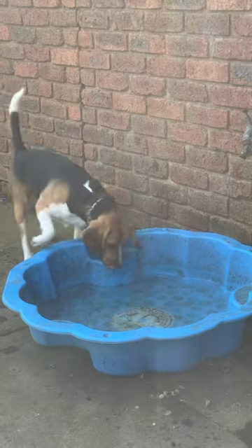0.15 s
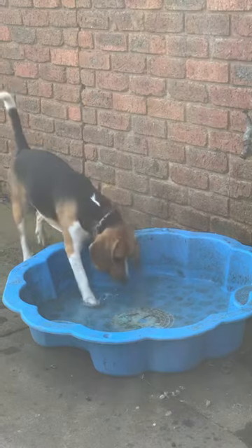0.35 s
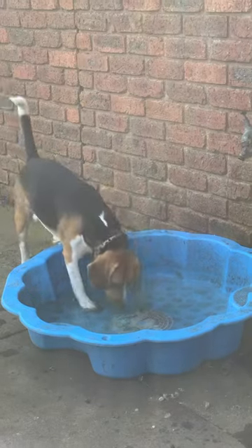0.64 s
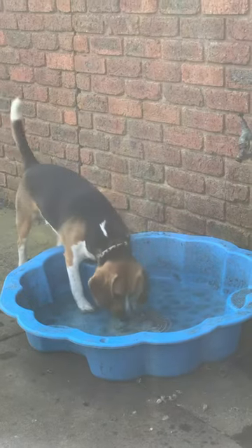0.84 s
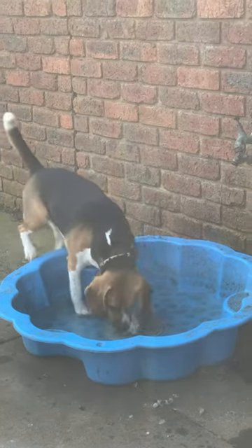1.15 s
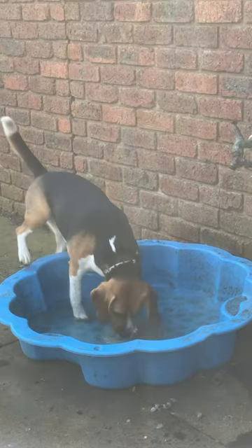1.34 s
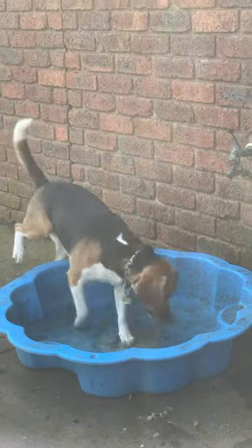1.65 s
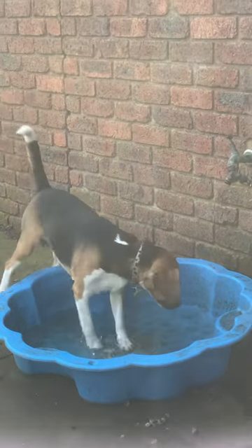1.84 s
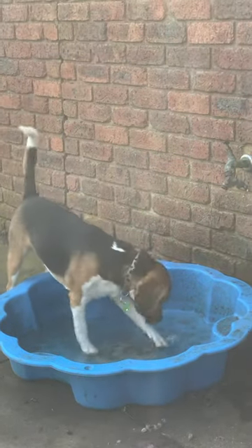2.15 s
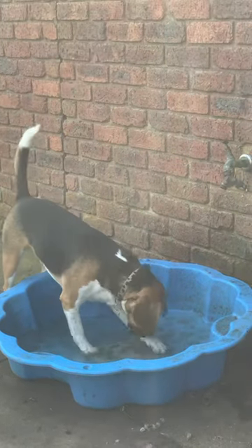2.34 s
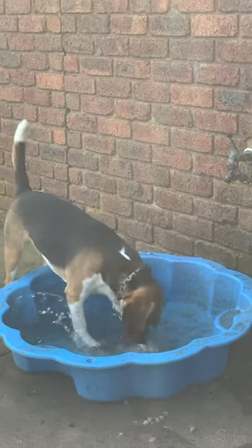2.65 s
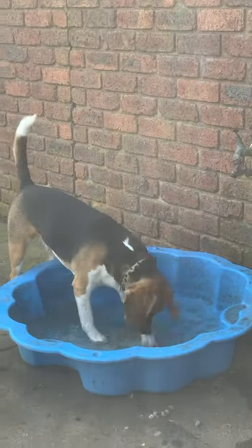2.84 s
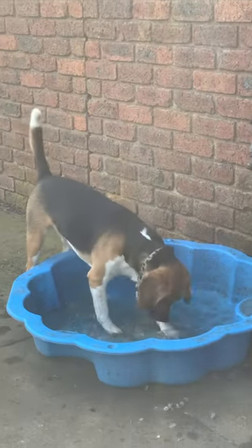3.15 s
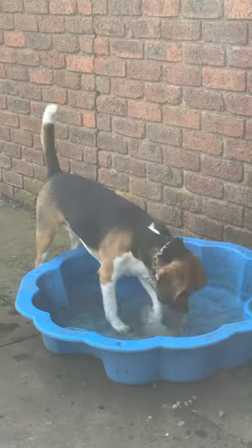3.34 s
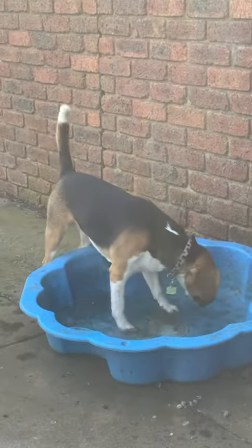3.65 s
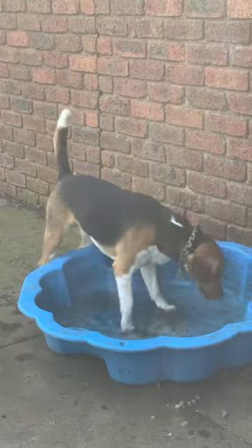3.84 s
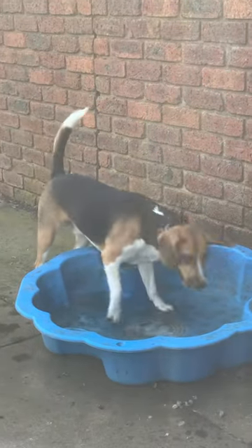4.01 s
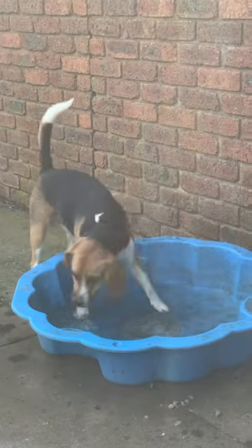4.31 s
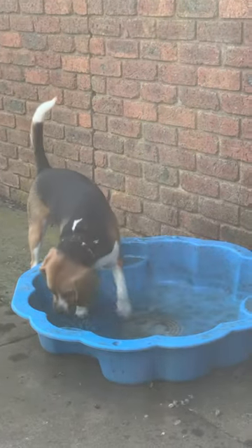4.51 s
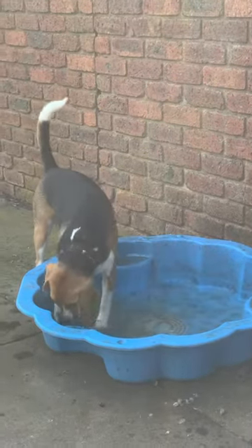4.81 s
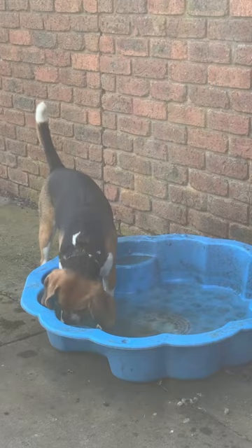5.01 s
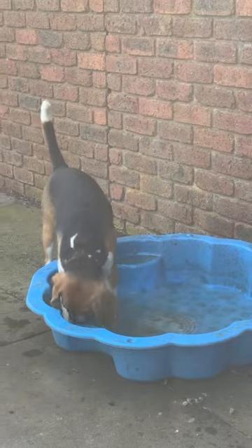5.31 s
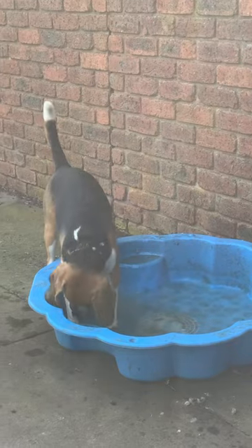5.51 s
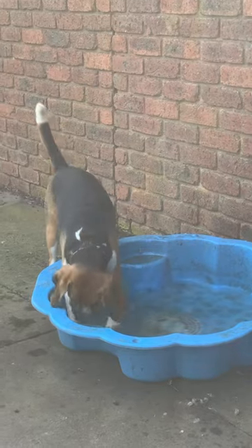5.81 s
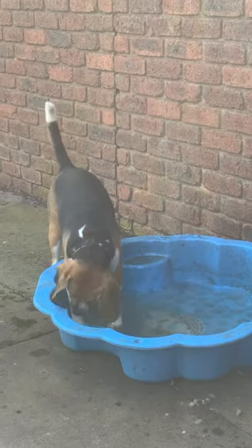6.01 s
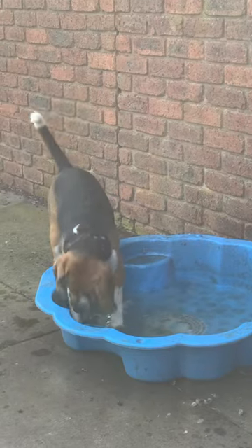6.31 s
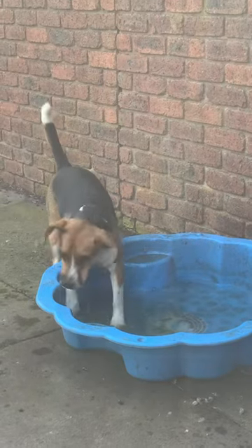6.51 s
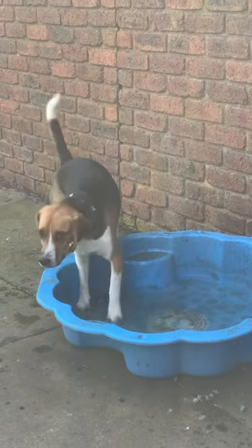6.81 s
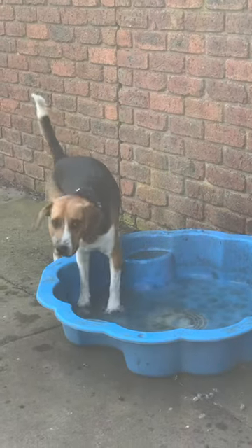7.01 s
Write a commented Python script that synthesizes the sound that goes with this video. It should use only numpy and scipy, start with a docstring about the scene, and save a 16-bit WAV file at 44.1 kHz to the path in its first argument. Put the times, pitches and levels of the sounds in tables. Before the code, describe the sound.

A dog paws at shallow water in a plastic paddling pool, with irregular slaps, bubbly plops, fine spray and dull tub thumps outdoors.

```python
"""A shallow plastic paddling pool beside a brick wall, where a dog paws and noses a few steps from a phone.
Paws slap the water: noise bursts crack, clouds of tiny ringing bubbles gurgle and spray.
Larger bubbles and torn air pockets ring at gliding pitches; paws thump the tub's low modes.
Swishes and snuffles are shaped noise, and stirred water trickles between the slaps.
Far traffic hums; two microphone ports hear the pool a little apart in time, with scattered echoes."""
import sys
import numpy as np
from scipy import signal
from scipy.fft import rfft, irfft, next_fast_len
from scipy.io import wavfile
from scipy.ndimage import uniform_filter1d, map_coordinates

SR = 44100
rng = np.random.default_rng(int(sys.argv[2]) if len(sys.argv) > 2 else 0)


def file_out(sig):
    """Save sig as 16-bit WAV at sys.argv[1]."""
    # one column per channel
    cols = np.atleast_2d(sig).T
    # limit, then scale
    lim = np.clip(cols, -1, 1)
    pcm = np.round(lim * 32767).astype(np.int16)
    wavfile.write(sys.argv[1], SR, pcm)


N = 315756

# Slaps and drops on the water, with settings for the crack, the spray and the plop:
# [start_s, crack_level_db, spray_level_db, plop_level_db, plop_pitch_hz, fade_s, rise_ms]
SLAP_EVENTS = [(.103, -60, -70, -62, 969.8, 0.2639, 6), (.348, -50, -57.5, -75, 1200, 0.2272, 6.86),
               (.445, -38, -47, -75.5, 2193, 0.10006, 0.755), (1.018, -43, -80, -70.5, 1645, 0.0498, 1),
               (1.178, -21, -51, -33, 1111, 0.2095, 0.5968), (1.241, -31, -49, -39, 1400, 0.16, 0.4415),
               (1.409, -50, -62, -47, 900, 0.1105, 2.294), (1.523, -34, -33, -38.5, 1745, .06, 2.5),
               (1.53, -11, -60, -38, 1878, 0.1007, 0.3993), (1.697, -60.5, -62.5, -66, 1037, 0.1966, 7.82),
               (1.732, -44, -54.5, -74, 1502, 0.0453, 0.986), (1.753, -25, -51, -70.5, 2036, 0.1446, .9),
               (1.808, -29.5, -55, -39.5, 1391, 0.0734, 3.682),
               (1.824, -30.5, -51.5, -49, 1549, 0.2072, 1.317), (1.872, -39, -49, -44, 1413, 0.0901, 0.989),
               (1.923, -31.5, -44.5, -85, 793.1, 0.0556, 0.656), (2.077, -45, -61, -67, 1844, 0.2148, 1.2),
               (2.148, -51, -50, -63, 2544, 0.078, 0.741), (2.232, -55, -66, -50, 1700, 0.04489, 4.08),
               (2.25, -51.5, -63, -53.5, 2397, 0.1041, 1), (2.366, -54.5, -55, -46.5, 1853, 0.0508, 4.256),
               (2.376, -24, -39, -46, 1100, 0.18903, 0.535), (2.434, -9.5,  -25, -35, 1467, 0.1456, 1.477),
               (2.444, -36.5, -32, -31.5, 1152, 0.18676, 7.094),
               (2.619, -36, -45, -71.5, 2602, 0.1586, 0.97), (2.651, -25, -55, -52, 1767, 0.3671, .6),
               (2.705, -27, -40, -71, 879.4, 0.03276, 0.93),
               (2.76, -28.5, -51.5, -41, 1526, 0.06704, 0.8683),
               (2.842, -19, -49.5, -41.5, 1143, 0.06455, 0.977),
               (2.85, -40, -31, -37.5, 1160, 0.14987, 4.55), (2.66, -40, -45, -42, 1200, .1, 2),
               (2.876, -27, -35.5, -36, 1594, 0.16103, 1.2), (3.012, -30, -70, -80.5, 1077, 0.0879, 1.44),
               (3.099, -25, -40, -47.5, 2617, 0.4787, 8.79), (3.138, -33, -48, -41, 1553, 0.13785, 2.479),
               (3.19, -31, -62, -53, 1200, 0.09505, 1.136),
               (3.231, -29.5, -69.5, -74.5, 1228, 0.0637, 1.226), (3.29, -34, -48, -50, 1900, .05, .6),
               (3.28, -40, -31.5, -32, 1681, 0.23042, 10.83),
               (3.311, -31.5, -34.5, -34.5, 1860, 0.07827, 1.3873),
               (3.458, -38.5, -55.5, -80.5, 2419, 0.1118, 0.776),
               (3.485, -30.5, -57, -48, 2555, 0.1154, 4.414), (3.502, -26, -51.5, -45, 1532, 0.2396, 0.746),
               (3.53, -28, -52, -56, 1900, .06, 1), (3.603, -29, -46, -60, 1200, .3, 2.5),
               (3.691, -31, -76.5, -41.5, 1121, 0.12634, 0.6782),
               (3.903, -49, -75, -50, 1398, 0.1094, 9.88), (4.016, -43, -51, -72, 1413, 0.176, 2.113),
               (4.211, -33, -52, -45, 1353, 0.1004, 0.721), (4.241, -40, -52, -65, 900, 0.1, 0.899),
               (4.298, -46, -60, -75, 1400, .05, 1), (4.62, -36, -35, -50, 3400, 0.1073, 4),
               (4.663, -34, -30.5, -30, 1628, 0.05237, 1.0172), (4.722, -50, -53, -41, 1300, .25, 12),
               (4.811, -31, -44.5, -80, 1580, 0.0653, 0.786), (4.905, -32.5, -47, -36, 1183, .13, 1.2),
               (4.987, -39, -51.5, -54.5, 1068, 0.2044, 4.496), (5.146, -45, -40, -42, 2400, .08, 6),
               (5.154, -27, -40, -34, 2425, 0.1192, 1), (5.28, -37.5, -34, -63.5, 1038, 0.05698, 4.717),
               (5.294, -30, -46, -29, 1750, 0.08, 1.2), (5.326, -37, -70, -41, 1737, 0.1, 0.8712),
               (5.462, -43, -65, -54, 1502, 0.133, 0.958), (5.531, -38, -28, -34, 2100, .13, 11),
               (5.555, -21, -53, -32.5, 1448, 0.0835, 0.5814), (5.649, -34, -53.5, -52, 2542, 0.1428, 12.6),
               (5.687, -34, -52.5, -38, 2092, 0.0993, 5.4), (5.752, -30, -32.5, -37, 1300, .19, 3),
               (5.82, -50, -60, -46, 1000, .06, 3), (5.905, -50, -60, -52, 1300, .1, 3),
               (5.945, -58.5, -57, -54, 900, 0.2017, 8.05), (6.037, -50, -60, -40, 1900, .09, 4),
               (6.088, -50, -55, -43, 1100, .08, 3), (6.115, -37, -37.5, -44.5, 2490, 0.04033, 3.95),
               (6.131, -21, -36, -29, 1354, .12, .6), (6.177, -30, -42, -41, 1700, 0.1743, 3),
               (6.301, -35, -59, -79.5, 1866, 0.3014, 0.843), (6.345, -36, -43, -53, 2724, 0.1058, 0.887),
               (6.368, -30, -52, -62, 2000, .06, 1), (6.462, -33.5, -78, -58.5, 2037, 0.172, 1.1),
               (6.578, -35, -53.5, -76.5, 1644, 0.0807, 1.06), (6.634, -38, -54, -48, 800, .1, 0.7565),
               (6.691, -40, -36, -54, 1982, .06, 3), (6.712, -40, -44, -46, 1500, .1, 4),
               (6.698, -16, -32, -45, 1990, .12, 1.5), (6.783, -54, -56.5, -46, 1440, 0.14685, 6.26),
               (6.9, -43, -63, -66.5, 1300, 0.0823, 0.672), (6.989, -36, -50, -73.5, 1093, 0.1855, 4.264),
               (7.03, -34, -62, -68.5, 1719, 0.2747, 0.985)]
# Tone colour of the spray: [pitch_hz, level_db]
SPRAY_COLOUR = [(1200, -18.5), (2500, -8), (3400, -5), (4200, -4), (6000, 2.5), (7500, -2), (9000, -8),
                (12000, -15), (15500, -29)]


def amp(db):
    """Turns decibels into a gain."""
    return 10 ** (np.asarray(db) / 20)


def unit(x):
    """Scales a sound to an rms level of 1."""
    return x / np.sqrt(np.mean(x ** 2) + 1e-20)


def along(points, hz):
    """Reads a curve of (Hz, value) points on a log frequency axis."""
    point_hz, value = np.transpose(points)
    return np.interp(np.log(hz + 1), np.log(point_hz + 1), value)


def curves(rows):
    """Draws straight lines between timed rows: one value per sample for each column after the time."""
    point_s, *columns = np.transpose(rows)
    return [np.interp(np.arange(N) / SR, point_s, column) for column in columns]


def wobble(rate):
    """Draws a smooth random curve with rate knots a second."""
    knots = rng.standard_normal(int(N * rate / SR) + 4)
    return map_coordinates(knots, [np.arange(N) * rate / SR])


def filtered(x, response):
    """Multiplies the spectrum of x by a response of frequency, which may be complex."""
    size = next_fast_len(N + SR // 2)
    hz = np.fft.rfftfreq(size, 1 / SR)
    return irfft(rfft(x, size) * response(hz), size)[..., :N]


def hiss(colour):
    """Makes coloured noise with an rms level of 1."""
    return unit(filtered(rng.standard_normal(N), lambda hz: amp(along(colour, hz))))


def add(track, s, sound):
    """Mixes a sound into a track, starting at s seconds."""
    part = track[max(round(s * SR), 0):][:len(sound)]
    part += sound[:len(part)]


def swell(t, rise, t60):
    """Shapes a soft rise, then an exponential fall of 60 dB in t60 seconds, both kept within limits."""
    onset = (1 - np.exp(-t / np.clip(rise, 2e-4, .05))) ** 2
    return onset * amp(-60 * t / np.clip(t60, .01, .6))


def patchy(x, depth_db):
    """Varies the gain at random in small patches of time and frequency."""
    z = signal.stft(x, nperseg=256)[2]
    field = uniform_filter1d(rng.standard_normal(z.shape), size=4, axis=0)
    field = uniform_filter1d(field, size=6, axis=1)
    return unit(signal.istft(z * amp(depth_db * unit(field)), nperseg=256)[1][:N])


def bubble(t, hz, lift, t60):
    """A bubble nearing the surface rings at a rising, unsteady pitch; lift is the share it climbs."""
    settle = t60 / 5
    turns = hz * (t + lift * (t - settle * (1 - np.exp(-t / settle))))
    flutter = uniform_filter1d(rng.standard_normal((2, len(t))), size=130)
    tone = np.sin(2 * np.pi * turns + 1.6 * flutter[0])
    return tone * (1 + 2.5 * flutter[1]) * swell(t, t60 / 18, t60)


def froth(colour, centre_hz, octaves, cycles, scatter_db, noise, count, size):
    """Many tiny random bubbles ring around a set pitch, over patchy noise; the rms level is 1."""
    start = rng.integers(0, N, count)
    pitch = rng.standard_normal((count, 1))
    big = rng.exponential(size=(count, 1))
    near_hz = centre_hz[start, None]
    hz = np.clip(near_hz * 2 ** (octaves * pitch), 400, 12000)
    turns = hz * np.arange(size) / SR
    rings = np.sin(2 * np.pi * turns * (1 + .015 * turns / cycles))
    rings = rings * np.exp(-turns / cycles) * (1 - np.exp(-turns))
    # low bubbles last longer, so they start softer
    levels = amp(scatter_db * np.minimum(big, 3.5)) * np.sqrt(hz / near_hz)
    places = start[:, None] + np.arange(size)
    grains = np.bincount(places.ravel(), (rings * levels).ravel(), N + size)
    return unit(unit(grains[:N]) + noise * patchy(hiss(colour), depth_db=3))


def cracks():
    """Each slap cracks as a short burst of random clicks, which the nearby bricks repeat once."""
    out, t = np.zeros(N), np.arange(800) / SR
    for s, crack_db, _, _, _, _, rise_ms in SLAP_EVENTS:
        clicks = 1.5 * rng.choice([-1, 1], size=800)
        add(out, s + .001, amp(crack_db) * swell(t, .4 * rise_ms / 1000, t60=.01) * clicks)
    echo = lambda hz: 1 + 0.18 * np.exp(-2j * np.pi * hz * 0.0024)  # 2.4 ms later
    return filtered(out, lambda hz: echo(hz) * amp(0.8198 * along(SPRAY_COLOUR, hz)))


def plops():
    """Each slap traps three bubbles, which ring soon after it near its plop pitch."""
    out, t = np.zeros(N), np.arange(SR // 12) / SR
    for s, _, _, plop_db, plop_hz, _, rise_ms in SLAP_EVENTS:
        for late, octave in rng.uniform(size=(3, 2)):
            ring = bubble(t, plop_hz * 2 ** (0.53182 * (octave - .5)), lift=0.19, t60=0.034)
            add(out, s + 1.504 * rise_ms / 1000 + 0.015 * late, amp(plop_db - 3.5) * ring)
    return out


def stirring():
    """Slow stirring, sloshes and slaps set the loudness of the low gurgle and the high spray."""
    # Slow stirring under everything: [time_s, gurgle_level_db, spray_level_db]
    stir_levels = [(0, -83, -75), (.3, -79, -83.5), (.8, -94, -92), (1.35, -79.5, -84), (1.9, -78, -71),
                   (2.3, -73, -82.5), (2.7, -72, -63), (3.2, -78, -65), (3.55, -72, -66),
                   (3.72, -81.5, -83.5), (4.05, -72.5, -80.5), (4.4, -90, -92), (4.8, -77.5, -66),
                   (5.06, -72.5, -77), (5.45, -62.5, -62.5), (5.9, -60.5, -66), (6.4, -63, -63),
                   (6.6, -77.5, -76), (6.85, -71, -66.5), (7.16, -79, -85)]
    # Water shoved aside without a blow; fall_s is the time to fall 20 dB after the crest:
    # [crest_s, gurgle_level_db, spray_level_db, fall_s]
    shoves = [(.44, -62, -65, 0.0633), (.57, -70, -74.5, 0.208), (1.029, -64.5, -69.5, 0.1983),
              (1.28, -59.5, -79, 0.0968), (1.45, -58, -68, .08), (1.51, -55, -59, .06),
              (1.599, -65, -65, 0.0783), (1.74, -67.5, -63, 0.0008), (1.83, -75, -60.5, 0.1575),
              (2.19, -63, -71.5, 0.0761), (2.259, -60.5, -63, 0.0612), (2.42, -52.5, -71.5, 0.1434),
              (2.58, -62, -59.5, 0.009), (2.69, -57, -43, 0.0172), (2.73, -69, -45, 0.0551),
              (2.84, -49.5, -50.5, 0.0431), (2.92, -54, -72, 0.1362), (3.091, -61.5, -49.5, 0.1152),
              (3.291, -47.5, -66.5, 0.0966), (3.57, -60, -49.5, 0.1299), (3.88, -70, -61, .14),
              (4.131, -65.5, -63.5, 0.1312), (4.25, -66, -77, .08), (4.48, -68, -68, .05),
              (4.54, -67, -60.5, 0.0896), (4.69, -52, -62, 0.0448), (4.87, -66, -58, 0.1753),
              (5.131, -50.5, -52.5, 0.1015), (5.34, -59, -66, 0.1638), (5.589, -54.5, -55.5, 0.2029),
              (5.74, -68, -56, 0.1781), (5.89, -55, -66, .08), (5.97, -52, -65.5, .1), (5.8, -60, -47, .04),
              (6.045, -53, -46.5, 0.0269), (6.3, -60.5, -58, 0.1436), (6.46, -51.5, -50, 0.1253),
              (6.7, -65, -50, 0.03), (6.74, -48.5, -65.5, 0.0231), (6.9, -70, -62, .05),
              (6.959, -63, -58, .08)]
    low, high = amp(curves(stir_levels))
    clock = np.arange(SR) / SR - .5  # seconds from the crest
    for s, gurgle_db, spray_db, fall in shoves:
        slope = np.where(clock < 0, 0.8283 * fall, fall)  # rises a little faster than it falls
        hump = amp(-20 * np.abs(clock) / slope)
        hump = hump[max(round((.5 - s) * SR), 0):]
        add(low, s - .5, amp(gurgle_db) * hump)
        add(high, s - .5, amp(spray_db) * hump)
    low, high = low * amp(0.62 * wobble(30)), high * amp(2.2605 * wobble(45))
    t, swell_s = np.arange(SR // 4) / SR, .012
    faint_swell = (t[t < swell_s] / swell_s) ** 2
    for s, crack_db, spray_db, plop_db, _, t60, rise_ms in SLAP_EVENTS:
        rise = rise_ms / 1000
        add(low, s, amp(plop_db) * swell(t, rise, 0.68013 * t60))
        add(high, s, amp(spray_db) * swell(t, 1.1 * rise, t60))
        # a faint hiss swells for 12 ms around the start of each crack, mostly before it
        add(high, s + .002 - swell_s, amp(crack_db - 20) * faint_swell)
    return low, high


def water():
    """Gurgling and spraying froth follows the stirring, joined by the cracks and plops of the slaps."""
    # Tone colour of the noise in the gurgle: [pitch_hz, level_db]
    gurgle_colour = [(350, -2.5), (700, -4.5), (1100, 5), (1800, -7), (2800, -3), (4000, -15.5),
                     (6000, -20.5), (9000, -44.5)]
    # Gain of the treble above treble_hz: [time_s, level_db]
    treble_levels = [(0, 4), (1.2, 3), (1.6, -3), (2.4, -8), (3.3, -1), (3.6, 16), (4.2, 8), (4.8, -2),
                     (5.6, 6), (6.2, 10), (7.16, 4)]
    treble_hz = 11500
    low, high = stirring()
    slap_s, slap_hz = np.transpose(sorted((row[0], row[4]) for row in SLAP_EVENTS))
    # the gurgle keeps the pitch of the last slap
    last_slap = np.searchsorted(slap_s, np.arange(N) / SR) - 1
    gurgle_hz = slap_hz[np.maximum(last_slap, 0)]
    gurgle = froth(gurgle_colour, gurgle_hz, octaves=.44, cycles=5.5, scatter_db=4,
                   noise=.75, count=4500, size=700)
    fine_hz = np.full(N, 5200.)
    spray = froth(SPRAY_COLOUR, fine_hz, octaves=.55, cycles=9, scatter_db=5,
                  noise=1.1, count=7000, size=400)
    # bursting droplets under the spray
    crackle = froth(SPRAY_COLOUR, fine_hz, octaves=.6, cycles=1.5, scatter_db=5,
                    noise=.1, count=2500, size=120)
    bright = high * (spray + amp(-9) * crackle) + cracks()
    treble = filtered(bright, lambda hz: 1 / (1 + (treble_hz / (hz + 1)) ** 24))
    treble_change = amp(curves(treble_levels)[0]) - 1
    return low * gurgle + plops() + bright + treble_change * treble


def bubbles():
    """The larger bubbles ring one by one, each with its own climbing pitch."""
    # Single clear bubbles; pitch_rise is a share of the first pitch:
    # [start_s, level_db, first_pitch_hz, pitch_rise, fade_s]
    clear_bubbles = [(1.11, -52, 7700, .05, .03), (3.46, -36, 6900, .05, .02), (3.745, -44, 6300, .05, .02),
                     (1.709, -30, 5900, .08, 0.012), (1.72, -42, 1964, 0.04205, 0.0383),
                     (2.281, -37, 983.4, 0.1107, 0.04354), (2.755, -31, 1952, 0.08146, 0.035),
                     (3.01, -50.5, 555.1, 0.1054, 0.108), (3.195, -39, 595.3, 0.1027, 0.06195),
                     (3.503, -34.5, 948.8, 0.4845, 0.07904), (3.645, -36, 1962, 0.0555, 0.0223),
                     (3.907, -46, 1150, 0.7, .1), (4.749, -28, 1250, 0.6, 0.05),
                     (5.326, -32, 1550, .35, .04), (4.915, -33, 1000, .5, .05),
                     (4.81, -24, 4300, 0.15, 0.015), (6.342, -19, 3050, 0.15, 0.0135),
                     (6.424, -39.5, 1449, 0.0484, 0.0883), (6.463, -36.5, 1966, 0.0385, 0.0398),
                     (6.487, -37.5, 1763, 0.0737, 0.07128), (6.725, -31, 1004, 0.15, 0.045),
                     (6.784, -40, 1450, .1, .015), (2.138, -50, 930, .08, .05),
                     (2.153, -52, 2900, .04, .04), (3.058, -45, 980, .08, .05),
                     (2.575, -48, 2100, .04, .025), (2.668, -34, 1130, .08, .04),
                     (3.14, -36, 1700, .1, .04), (3.31, -32, 1950, .06, .03), (5.76, -31, 930, .1, .05),
                     (5.825, -42, 1080, .08, .03), (2.214, -44, 2050, .1, .02),
                     (3.542, -42, 2050, .05, .025), (5.153, -30, 2500, 0.15, 0.025),
                     (5.188, -49.5, 2014, 0.0299, 0.04024), (6.489, -40, 1494, 0.0286, 0.0676),
                     (6.807, -31, 3050, 0.12, 0.015), (6.954, -45, 1801, 0.02497, 0.03553),
                     (7.061, -54.5, 1530, 0.02763, 0.05854), (7.073, -43, 4050, 0.1, 0.04),
                     (2.761, -44.5, 1476, 0.0494, 0.0543), (2.619, -40.5, 2858, 0.0271, 0.0431),
                     (3.225, -41.5, 3021, 0.0346, 0.036)]
    out, t = np.zeros(N), np.arange(SR // 4) / SR
    for s, db, hz, lift, t60 in clear_bubbles:
        add(out, s, amp(db) * bubble(t, hz, lift, t60))
    return out


def pockets():
    """Each air pocket rings at a steadily gliding pitch, then closes."""
    # Pockets torn open by a paw (pitch falls) or filling up again (pitch climbs):
    # [start_s, level_db, first_pitch_hz, last_pitch_hz, length_s, roughness 0-1]
    air_pockets = [(1.179, -30, 1400, 800, .02, .5), (1.19, -33, 1300, 700, .025, .7),
                   (1.243, -40, 1500, 600, .025, .7), (4.249, -41, 640, 1230, .055, .08),
                   (4.664, -31, 1600, 350, .026, .6), (4.906, -34, 1300, 800, .022, .5),
                   (5.294, -30, 1100, 700, .018, .4), (5.757, -38, 1200, 500, .03, .7),
                   (6.131, -27, 1550, 1200, .016, .4), (6.14, -33, 1100, 600, .03, .7),
                   (6.637, -44, 1200, 300, .02, .6), (6.646, -33, 340, 240, .01, .3)]
    out = np.zeros(N)
    for s, db, first_hz, last_hz, length, rough in air_pockets:
        life = np.arange(4000) / SR / length
        life = life[life < 1]  # 0 at the start, 1 at the end
        shake = unit(uniform_filter1d(rng.standard_normal(4000), size=60))[:len(life)]
        turns = np.cumsum(first_hz + (last_hz - first_hz) * life) / SR
        shape = np.minimum(life / .06, 1) * np.minimum((1 - life) / .25, 1)
        shape = shape * amp(-9 * life)
        add(out, s, amp(db) * shape * np.sin(2 * np.pi * turns + 1.5 * rough * shake))
    return out


def tub():
    """Rough pushes and paw blows on the plastic shell ring its few low modes."""
    # Resonances of the shell: [pitch_hz, width_hz, level_db]
    shell_modes = [(65.128, 51.48, -7.5), (103.38, 28.62, -1), (231.83, 60.04, -6), (344.86, 58.215, -5.5),
                   (513.33, 260.7, -15.5)]
    # The tub flexing under shifting weight: [time_s, level_db]
    flex_levels = [(0, -64), (.45, -61.5), (.95, -74.5), (1.4, -64.5), (1.75, -62), (2.0, -71),
                   (2.5, -66.5), (3.0, -61), (3.6, -56.5), (3.75, -68), (4.2, -62), (4.35, -73), (4.6, -76),
                   (4.9, -58.5), (5.2, -58), (5.7, -64.5), (5.9, -50), (6.1, -57), (6.5, -61.5),
                   (7.16, -62.5)]
    # Paws landing on the floor; the upper modes' level is relative to the first level:
    # [start_s, level_db, upper_level_db, fade_s]
    landings = [(0.093, -20, -24, 0.4), (0.444, -37, -28.5, 0.1655), (0.615, -24, -17, 0.33),
                (1.039, -34.5, -11.5, 0.1792), (1.18, -19.5, -17.5, 0.3232), (1.243, -25.5, -16.5, 0.2749),
                (1.42, -34, -10, 0.3894), (1.535, -29.5, -13, 0.2159), (1.837, -29.5, -16.5, 0.2887),
                (2.407, -51, 8.5, 0.4417), (2.449, -40, 6, 0.3537), (2.666, -35, -2, 0.5226),
                (2.844, -45.5, -0.5, 0.4326), (3.157, -31.5, 1.5, 0.3601), (3.26, -29, -17.5, 0.2882),
                (3.377, -33.5, -27, 0.1907), (3.591, -50, 4, 0.292), (3.816, -37.5, -25, 0.203),
                (3.919, -43, -21, 0.196), (4.165, -41, -19.5, 0.2396), (4.251, -39.5, -17, 0.1499),
                (4.672, -29, -6, 0.2224), (4.941, -35.5, -43.5, 0.69), (5.324, -20, -48.5, 0.2444),
                (5.455, -31.5, -17.5, 0.386), (5.561, -36, -17.5, 0.2417), (5.766, -34, -21, 0.3798),
                (5.892, -29, -12, 0.15), (5.93, -28, -14, 0.25), (5.978, -16, -26, 0.2),
                (6.02, -28, -18, .15), (6.136, -15, -22, 0.20665), (6.226, -32, -27.5, 0.23),
                (6.168, -18, -24, 0.16), (6.64, -34, -6, 0.1527), (6.69, -30, -24, 0.2534),
                (6.655, -30, -20, .15), (6.728, -25, -22, 0.16), (6.75, -24, -24, .1),
                (6.81, -38, -22, 0.3588)]

    def ringing(modes):
        """Adds up resonances with alternating signs."""
        def response(f):
            total = 0
            for k, (centre, width, db) in enumerate(modes):
                peak = 1j * f * width / (centre * centre - f * f + 1j * f * width)
                total = total + (-1) ** k * amp(db) * peak
            return total
        return response

    def soft(f):
        """Water damps the treble; the shell is too small for deep bass."""
        return 1 / (1 + (f / 650) ** 4) * f ** 4 / (f ** 4 + 50 ** 4)

    flex_db = curves(flex_levels)[0]
    deep = amp(flex_db + 3.256 * wobble(8.1))
    upper = amp(flex_db - 5.0 + 2.931 * wobble(9))
    blows, t = np.zeros((2, N)), np.arange(SR // 2) / SR
    for s, db, upper_db, t60 in landings:
        add(deep, s, amp(db - 17) * swell(t, 0.006888, t60))
        add(upper, s, amp(db + upper_db - 1.5) * swell(t, 0.0030195, 0.6863 * t60))
        add(blows[0], s, amp(db - 0.5) * np.hanning(120))  # a soft pad: a push of a few ms
        add(blows[1], s, amp(db + upper_db + 16.0) * np.hanning(50))
    rubs = unit(filtered(rng.standard_normal((2, N)), soft))
    out = np.zeros(N)
    parts = [ringing(shell_modes[:2]), ringing(shell_modes[2:])]
    for level, rub, blow, ring in zip([deep, upper], rubs, filtered(blows, soft), parts):
        out += level * unit(filtered(rub, ring)) + filtered(blow, ring)
    return out


def swishes():
    """A paw drags through the water: a narrow band of noise slides with the stroke."""
    # Soft swishes: [start_s, length_s, level_db, first_pitch_hz, last_pitch_hz]
    strokes = [(0.469, .16, -64, 1550, 1800), (.9, .15, -62, 1400, 1560), (2.001, .2, -63.5, 1580, 1751),
               (4.465, .12, -64, 1450, 1600)]
    fade_s = 0.0352
    out, t = np.zeros(N), np.arange(N) / SR
    for s, length, db, first_hz, last_hz in strokes:
        on = np.clip(np.minimum(t - s, s + length - t) / fade_s + .5, 0, 1) ** 2
        hz = np.interp(t, [s, s + length], [first_hz, last_hz])
        out += on * amp(db) * wobble(600) * np.sin(2 * np.pi * np.cumsum(hz) / SR)
    return out


def snuffles():
    """The dog snuffles at the water: even hiss swells and fades."""
    # Smooth washes of hiss: [start_s, length_s, level_db]
    washes = [(.02, .22, -50), (.92, .09, -68), (6.0, .075, -44)]
    # Tone colour of that hiss: [pitch_hz, level_db]
    snuffle_colour = [(600, -10), (1500, -2), (2700, -8), (4000, -2), (5500, -4), (7200, 3), (8800, -6),
                      (12000, -20), (15500, -33)]
    t, on = np.arange(N) / SR, np.zeros(N)
    for s, length, db in washes:
        on += amp(db) * np.sin(np.pi * np.clip((t - s) / length, 0, 1)) ** 2
    return on * hiss(snuffle_colour)


def wall(x):
    """Bricks and ground answer briefly, unlike at each port, with a new random tail each quarter second."""
    # Time for the answer to fall 60 dB: [pitch_hz, fade_s]
    answer_fades = [(200, .1), (1500, .08), (8000, .05)]
    # Colour of the scattered sound that comes back: [pitch_hz, level_db]
    scatter_colour = [(300, -16.5), (700, 2.5), (1100, -9), (2500, -5), (4000, -5), (5500, -27),
                      (10000, -12), (15000, -38.5)]
    out, step = np.zeros((2, N + SR)), SR // 4
    for start in range(0, N, step):
        hz, t, z = signal.stft(rng.standard_normal((2, SR // 8)), SR, nperseg=256)
        fading = z * amp(-60 * t / along(answer_fades, hz)[:, None])
        tail = signal.istft(fading, SR, nperseg=256)[1]
        tail = tail / np.linalg.norm(tail[0])
        answer = signal.fftconvolve(x[None, start:start + step], tail, axes=1)
        out[:, start + 200:][:, :answer.shape[1]] += answer  # begins 200 samples late
    return filtered(out[:, :N], lambda hz: amp(along(scatter_colour, hz)))


def yard():
    """Far traffic hum and air: noise shared by both ports, and fainter noise separate at each."""
    # Tone colour of the hum and air: [pitch_hz, level_db]
    yard_colour = [(25, -47), (45, 9), (80, 4), (150, -4.5), (300, -8), (500, -22), (1000, -13),
                   (1700, -23.5), (2600, -45), (4500, -42), (7200, -25), (10000, -36), (15500, -33)]
    shared = amp(-64.5 + 0.69 * wobble(1.4)) * hiss(yard_colour)
    apart = amp(-73) * np.array([hiss(yard_colour), hiss(yard_colour)])
    return shared, apart


def ports(x):
    """One sound reaches the two ports with a lead and a level tilt that depend on frequency."""
    # Phase of the left side against the right, mostly rising with pitch but flat in places: [pitch_hz, #
    # phase_radians]
    left_lead = [(60, -.2), (450, -.7), (1150, -.9), (1400, .4), (2050, .5), (2950, 2.8), (4000, 1.5),
                 (5100, 3.1), (8000, 6.3), (9100, 6.4), (11900, 9.4), (13300, 9.5), (15300, 12.6)]
    # Left level minus right level: [pitch_hz, level_db]
    left_tilt = [(60, -.6), (380, -.6), (700, -3.5), (1300, -2.5), (2400, -1.5), (6000, 0)]
    side = np.array([[.5], [-.5]])  # half to each port

    def response(hz):
        return np.exp(1j * side * along(left_lead, hz)) * amp(side * along(left_tilt, hz))

    return filtered(x, response)


def scene():
    """Mixes pool, wall and yard at the two ports."""
    wet = water() + bubbles() + pockets() + swishes() + snuffles()
    hum, apart = yard()
    return ports(wet + tub() + hum) + wall(wet) + apart


def record(dry):
    """The phone keeps nothing from its band limit of 15850 Hz upward."""
    return filtered(dry, lambda hz: hz < 15850)


dry = scene()
out = record(dry)
file_out(out)
```